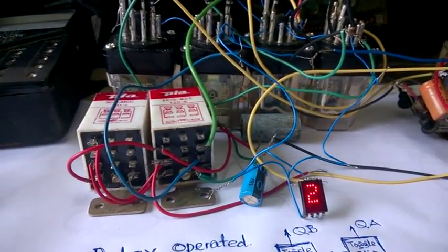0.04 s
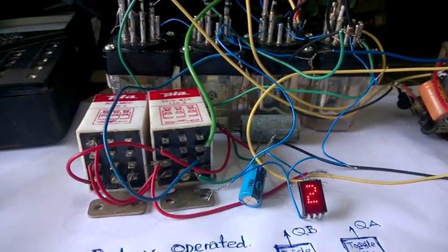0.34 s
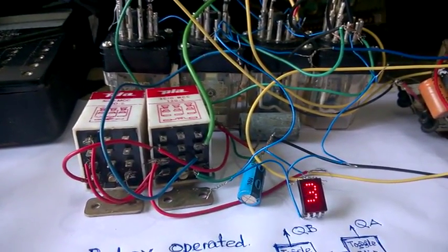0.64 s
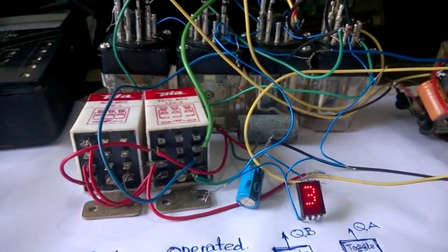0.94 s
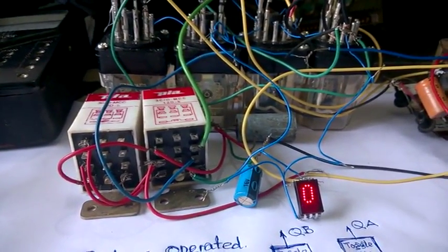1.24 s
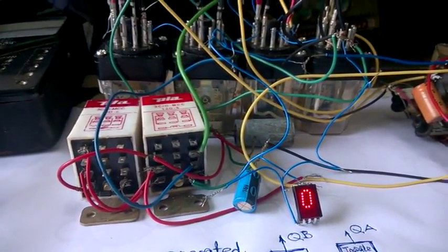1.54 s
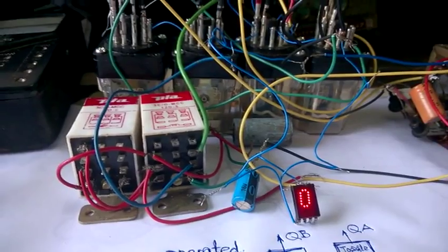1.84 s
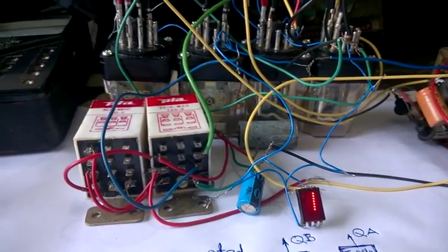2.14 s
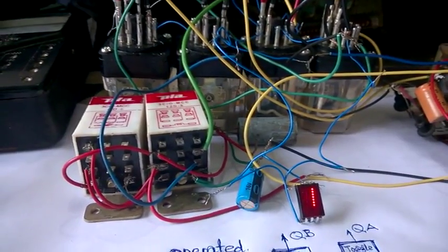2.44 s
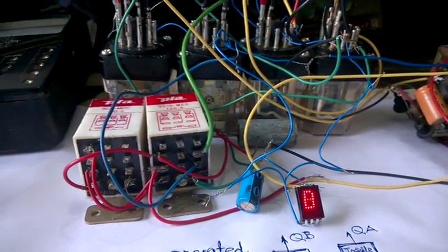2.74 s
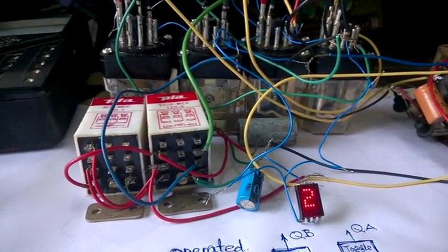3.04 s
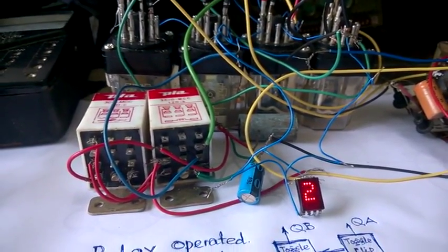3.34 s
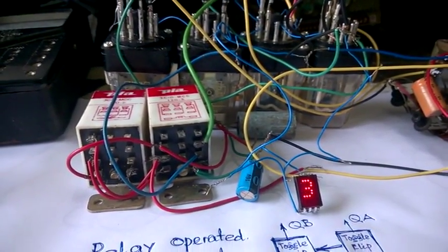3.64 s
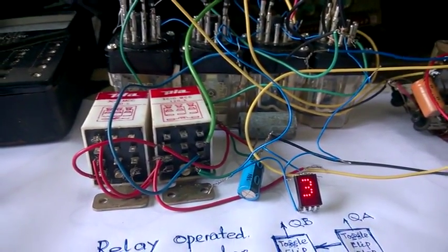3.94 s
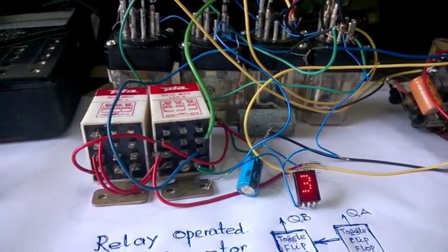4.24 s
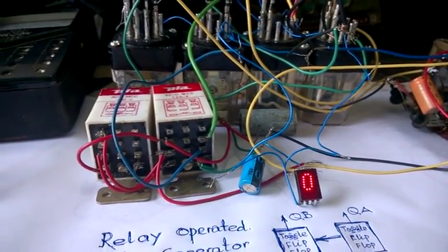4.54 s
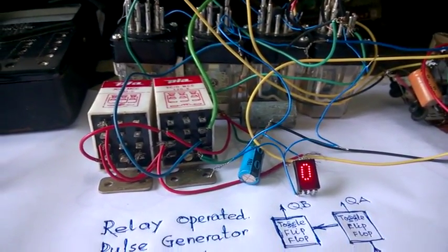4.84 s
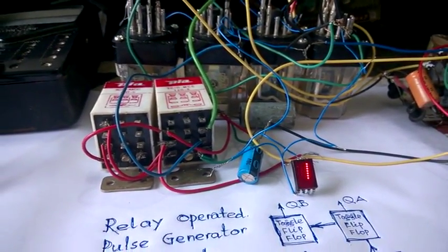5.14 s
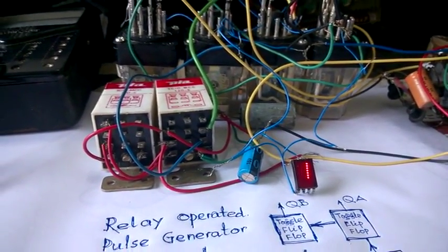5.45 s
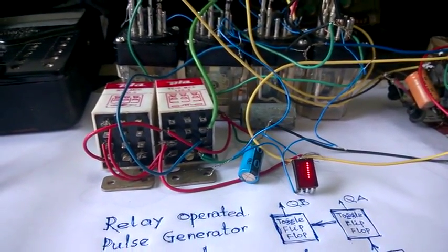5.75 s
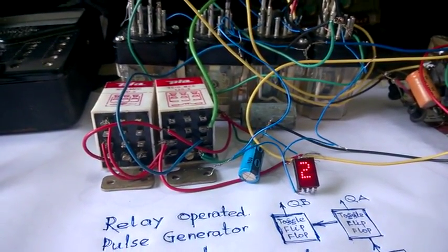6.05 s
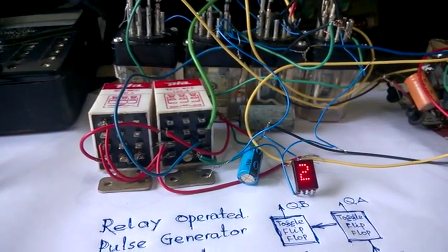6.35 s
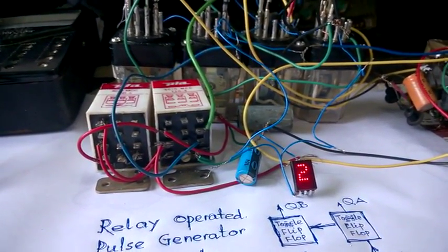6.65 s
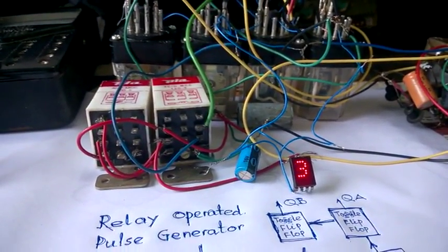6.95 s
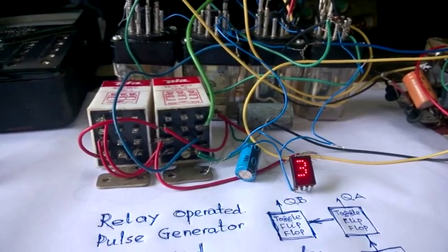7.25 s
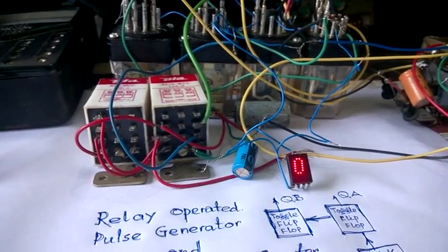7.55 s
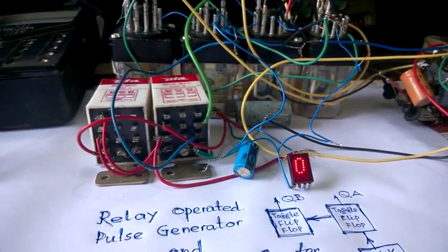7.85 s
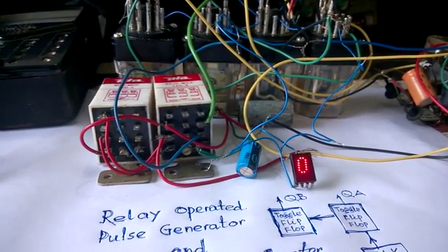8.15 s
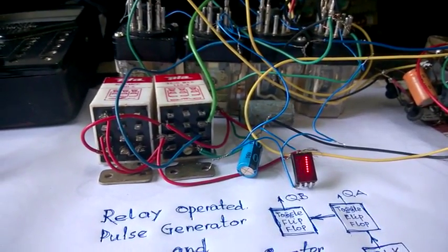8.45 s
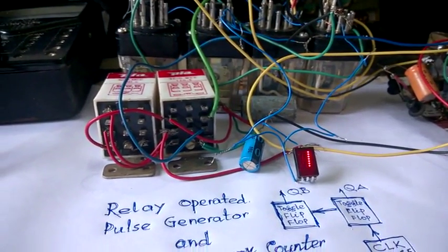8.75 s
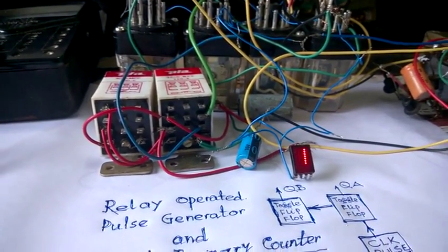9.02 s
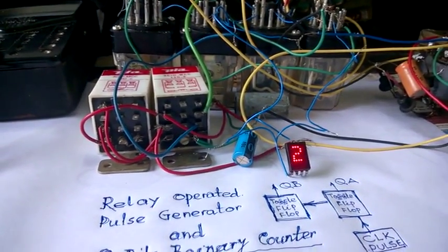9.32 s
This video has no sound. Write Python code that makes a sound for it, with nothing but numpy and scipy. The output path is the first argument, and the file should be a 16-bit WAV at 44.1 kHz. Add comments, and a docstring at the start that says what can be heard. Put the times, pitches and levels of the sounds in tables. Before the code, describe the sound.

Over a very quiet low hum and thin high hiss, a set of relays starts clacking almost at once and keeps a steady beat, a little faster than once a second. Small ticks run straight into each louder metallic snap, and every second step has a slightly busier rattle. Springs ring briefly and the workbench thuds softly. The sound is close and fairly dry, in a small room.

```python
"""A low hum and a thin wavering hiss, then sharp clacks close by, about every 0.8 s:
a two-bit relay counter stepping on a workbench. Each step is a quick cascade: the timing relay trips,
a second relay ticks, the big armatures slam and chatter; on even counts the second stage clacks too.
Springs ring, the bench thumps and a small room answers."""
import sys
import numpy as np
from scipy import signal
from scipy.fft import rfft, irfft, next_fast_len
from scipy.io import wavfile
from scipy.ndimage import uniform_filter1d, minimum_filter1d, map_coordinates

SR = 44100
rng = np.random.default_rng(int(sys.argv[2]) if len(sys.argv) > 2 else 0)


def transcribe(signal):
    """Save signal, clipped to [-1, 1], as a 16-bit WAV file at the path in sys.argv[1]."""
    frames = np.atleast_2d(signal).T
    limited = np.clip(frames, -1, 1)
    pcm = np.round(limited * 32767).astype(np.int16)
    wavfile.write(sys.argv[1], SR, pcm)


N = 422470


def amp(db):
    """Decibels to gain."""
    return 10 ** (np.asarray(db) / 20)


def unit_rms(x):
    """Scale to rms 1."""
    return x / np.sqrt(np.mean(x ** 2) + 1e-20)


def log_interp(points, hz):
    """Interpolate (f/Hz, value) points on a log frequency axis."""
    f, values = np.transpose(points)
    return np.interp(np.log(hz + 1), np.log(f + 1), values)


def wobble(rate_hz):
    """Smooth random curve, rate_hz knots a second."""
    knots = rng.standard_normal(int(N * rate_hz / SR) + 4)
    return map_coordinates(knots, [np.arange(N) * rate_hz / SR])


def filtered(x, response):
    """Apply a complex frequency response."""
    size = next_fast_len(len(x) + SR // 10)
    return irfft(rfft(x, size) * response(np.fft.rfftfreq(size, 1 / SR)), size)[:len(x)]


def noise(spectrum):
    """Coloured noise, rms 1."""
    return unit_rms(filtered(rng.standard_normal(N), lambda hz: amp(log_interp(spectrum, hz))))


def add(track, start_s, sound):
    """Mix a sound into the track."""
    part = track[round(start_s * SR):][:len(sound)]
    part += sound[:len(part)]


def resonances(body):
    """Causal response of parallel band-passes, alternating in sign."""
    return lambda f: sum((-1) ** k * amp(db) * 1j * f * width / (hz * hz - f * f + 1j * f * width)
                         for k, (hz, width, db) in enumerate(body))


def impact(body, chatter_s, rise_s, t60_s):
    """Metal on metal: a burst of tiny bounces drives the body's resonances; rms 1 over the first 5 ms."""
    t = np.arange(SR // 20) / SR
    envelope = (1 - np.exp(-t / rise_s)) * amp(-60 * np.maximum(t - chatter_s, 0) / t60_s)
    bounces = rfft(rng.standard_normal(len(t)) * envelope)
    flattened = bounces / np.sqrt(np.abs(bounces))  # drives the resonances more evenly
    force = irfft(flattened, len(t)) * np.sqrt(envelope)
    click = filtered(force, resonances(body))
    return click / np.sqrt(np.mean(click[:SR // 200] ** 2))


def ring(modes, rise_s, scatter_db):
    """Decaying modes, struck at new strengths each time."""
    t = np.arange(SR // 2) / SR
    tones = np.zeros(len(t))
    for hz, db, t60_s in modes:
        envelope = amp(db + scatter_db * rng.standard_normal() - 60 * t / t60_s)
        tones += envelope * np.sin(2 * np.pi * (hz * t + rng.random()))
    return tones * (1 - np.exp(-t / rise_s))


# noise spectra: f/Hz, relative density/dB
RUMBLE_SPECTRUM = [(12, -32.5), (20, -3), (43, -6.5), (65, -4), (134, -2), (163, -7.5), (195, 3),
                   (219, -11), (255, -1.5), (380, -15), (700, -25), (910, -51.5), (1540, -120)]
AIR_SPECTRUM = [(400, -4.5), (900, -0.5), (1800, 0.5), (3000, -6.5), (4800, -7.5), (7000, -13.5),
                (9000, -21.5), (10700, -17), (12000, -23), (16000, -27)]
# gentle swell midway: t/s, rumble level/dB, air level/dB
SWELL = [(0, -57.5, -63.5), (.7, -55.5, -67.5), (1.5, -55, -62), (3.1, -56, -67), (4.6, -56, -65.5),
         (5.3, -52, -60), (6.2, -53.5, -62.5), (6.9, -56, -64.5), (8.5, -57.5, -63)]
# hum tones: f/Hz, level/dB
HUM_TONES = [(100, -70.5), (197, -64)]
def background():
    """Low rumble, airy noise and hum, each wavering slightly."""
    t = np.arange(N) / SR
    times_s, rumble_db, air_db = np.transpose(SWELL)
    rumble = amp(np.interp(t, times_s, rumble_db) + 1.1 * wobble(3.9)) * noise(RUMBLE_SPECTRUM)
    air = amp(np.interp(t, times_s, air_db) + 0.79 * wobble(5)) * noise(AIR_SPECTRUM)
    hum = sum(amp(db + 2.5 * wobble(2.5)) * np.sin(2 * np.pi * hz * t + .92 * wobble(4.2))
              for hz, db in HUM_TONES)
    return rumble + air + hum


def hiss(centre_hz=5530, width_hz=300, level_db=-77.5, swing_db=5):
    """A thin high noise band comes and goes in uneven spells."""
    band = filtered(rng.standard_normal(N), lambda hz: np.exp(-((hz - centre_hz) / width_hz) ** 2))
    spells = np.tanh(2 * wobble(5.4))
    return amp(level_db + swing_db * spells) * unit_rms(band)


# chirp contour: t/s, f/Hz, level/dB
CHIRP_CONTOUR = [(3.31, 2850, -84), (3.34, 3270, -77), (3.38, 3350, -73), (3.41, 2900, -72),
                 (3.43, 2600, -84)]
# stray ticks: t/s, level/dB
FAINT_TICKS = [(1.0874, -64), (1.3927, -67)]
# their resonance: f/Hz, width/Hz, level/dB
FAINT_TICK_BODY = [(7800, 930, 0)]
def strays():
    """A faint arching chirp and two tiny ticks between steps."""
    t = np.arange(N) / SR
    times_s, hz, db = np.transpose(CHIRP_CONTOUR)
    phase = 2 * np.pi * np.cumsum(np.interp(t, times_s, hz)) / SR
    gate = (t > times_s[0]) & (t < times_s[-1])
    out = amp(np.interp(t, times_s, db)) * np.sin(phase) * gate
    for start_s, tick_db in FAINT_TICKS:
        add(out, start_s, amp(tick_db) * impact(FAINT_TICK_BODY, chatter_s=.002, rise_s=.0004, t60_s=.02))
    return out


# counter steps: trip t/s, trip-to-tick t/s, trip-to-slam t/s,
# then level/dB of tick, slam, high spring, low spring, bench
COUNTER_STEPS = [(0.4296, 0.015, 0.031, -21, -12.5, -18, -20.5, -38.5),
                 (1.2091, 0.014, .0307, -20.5, -11.5, -7, -25, -44.5),
                 (1.9882, .0147, 0.03, -20, -11.5, -9, -10, -33),
                 (2.7769, .016, 0.035, -19.5, -14.5, -8.5, -11.5, -35),
                 (3.5897, 0.015, 0.032, -20, -11, -22, 1, -44.5),
                 (4.327, .014, 0.029, -22, -14, -14, -6, -43.5),
                 (5.0942, 0.014, 0.032, -22.5, -11, -14, 4, -35),
                 (5.9049, 0.015, 0.032, -22, -13.5, -12.5, -17.5, -35.5),
                 (6.71, .016, .0335, -21.5, -11.5, -17, 4.5, -33.5),
                 (7.511, 0.017, 0.036, -19.5, -14.5, -18, -10, -51.5),
                 (8.3139, .0141, 0.031, -22.5, -13.5, -20, 6, -45.5),
                 (9.123, 0.016, 0.034, -21.5, -13.5, -17.5, -18.5, -36)]
def steps(first_count=3):
    """Per step: count reached (0-3), times of trip, tick and slam, five levels."""
    for k, (trip_s, tick_wait_s, slam_wait_s, *levels_db) in enumerate(COUNTER_STEPS):
        yield (first_count + k) % 4, trip_s, trip_s + tick_wait_s, trip_s + slam_wait_s, *levels_db


# tail colour: f/Hz, relative level/dB
ROOM_SPECTRUM = [(100, 4), (300, 4.5), (600, 4), (1000, -5.5), (1600, -5), (2050, -2.5), (2800, 3.5),
                 (3900, -6), (5000, -5), (6000, -3.5), (8000, -5), (12000, -1), (16000, -5)]
# tail decay: f/Hz, t60/s
ROOM_T60 = [(200, 0.35), (1000, .22), (3000, .21), (5000, 0.22), (6500, .195), (9000, .17), (15000, 0.078)]
def room(direct, onset_s=.005):
    """The walls take a moment, then answer each step with a fresh, quickly dying tail."""
    out = np.zeros(N)
    for _, trip_s, *_ in steps():
        hz, t, frames = signal.stft(rng.standard_normal(SR // 2), SR, nperseg=256)
        decay = amp(-60 * t / log_interp(ROOM_T60, hz)[:, None])
        tail = signal.istft(frames * decay, SR, nperseg=256)[1]
        tail = filtered(tail, lambda f: amp(log_interp(ROOM_SPECTRUM, f)))
        tail *= 1 - np.exp(-(np.arange(len(tail)) / SR / onset_s) ** 2)
        cascade = direct[round(trip_s * SR):][:SR // 10]
        add(out, trip_s, signal.fftconvolve(cascade, tail / np.linalg.norm(tail)))
    return out


# modes of metal parts, block on its feet, bench top, base, return spring: f/Hz, relative level/dB, t60/s
METAL_MODES = [(1096.6, -15.5, .15), (1525, -5, .16), (1627, -5, .17), (1980, -8, 0.32), (2070, -8, 0.34),
               (2410, -7.5, 0.14), (2660, -4.5, .25), (3010, -6, .15), (3320, -5, 0.13), (4020, -8.5, .19),
               (4550, -8.5, .19), (5300, -6, .17), (6220, -5.5, .21)]
FEET_MODES = [(88, -47, 0.15)]
BENCH_MODES = [(92, 0, 0.1), (141, -3, .15), (197, -1, .25), (238.5, 5, 0.18), (272.1, 9, .2),
               (291, 3, .16), (312, -2, .15)]
BASE_MODES = [(610, -50, 0.047), (762, -45.5, 0.096), (947, -39, 0.067)]
RETURN_SPRING_MODES = [(1810, -46, .55)]
def shaken_parts():
    """Each slam rings the metal, rocks the relay block and shakes the bench top, which builds up slowly."""
    out = np.zeros(N)
    for count, _, _, slam_s, *_, bench_db in steps():
        even = count % 2 == 0
        rock_db = 5.5 if even else 0  # harder when the second stage moves too
        add(out, slam_s, amp(-33.5) * ring(METAL_MODES, rise_s=.003, scatter_db=3.5))
        add(out, slam_s, amp(rock_db) * ring(FEET_MODES, rise_s=.0027, scatter_db=2))
        add(out, slam_s, amp(bench_db) * ring(BENCH_MODES, rise_s=.028, scatter_db=3))
        if not even:  # the armature lands alone and knocks the base
            add(out, slam_s, ring(BASE_MODES, rise_s=.0025, scatter_db=2.5))
        if count == 1:
            add(out, slam_s, ring(RETURN_SPRING_MODES, rise_s=.003, scatter_db=1))
    return out


def contact_springs(high_hz=6600, low_hz=4000, high_wait_s=.0015, low_wait_s=.0044,
                    rise_s=.0012, t60_s=.017):
    """Two contact springs zing after each slam, each by how squarely it is caught."""
    out = np.zeros(N)
    t = np.arange(SR // 20) / SR
    envelope = (1 - np.exp(-t / rise_s)) ** 2 * amp(-60 * t / t60_s)
    for _, _, _, slam_s, _, _, high_db, low_db, _ in steps():
        detuned_hz = high_hz * (1 + .011 * rng.standard_normal())
        add(out, slam_s + high_wait_s, amp(high_db) * envelope * np.sin(2 * np.pi * detuned_hz * t))
        add(out, slam_s + low_wait_s, amp(low_db) * envelope * np.sin(2 * np.pi * low_hz * t))
    return out


# frame and case resonances of each relay: f/Hz, width/Hz, relative level/dB
TIMER_BODY = [(970, 90, -33), (1750, 210, -4), (2170, 190, -3), (2620, 180, -8.5), (3020, 200, -11),
              (3810, 60, -6.5), (4200, 170, -6.5), (4830, 440, -2), (5590, 440, -5.5), (6600, 180, -17),
              (7510, 320, -19), (8340, 270, -15), (10460, 3000, -27), (14270, 4090, -30.5)]
SECOND_RELAY_BODY = [(1050, 50, -40), (1562, 120, 0), (2014, 320, -2), (2700, 390, -10), (3850, 760, -12),
                     (4690, 730, -6.5), (5940, 480, -5), (6280, 2000, -13), (7900, 600, -9),
                     (8460, 700, -14.5), (11150, 480, -12.5), (14390, 620, -15.5)]
STAGE_TWO_BODY = [(993, 150, -13), (1240, 130, -11.5), (1660, 720, -13.5), (2640, 340, -6), (3340, 240, -4),
                  (3950, 100, -2), (4280, 340, 3), (5460, 240, -6), (6350, 480, -8), (7800, 260, -6),
                  (8280, 490, -12.5), (10200, 1400, -11), (11600, 520, -12.5), (15400, 410, -19.5)]
# double clack on "drop out" (count 0) and "pull in" (count 2): t/s after the tick, level/dB
STAGE_TWO_CLACKS = {"drop out": [(.0052, -13.5), (.012, -17)], "pull in": [(.006, -15), (.0255, -21.5)]}
def light_relays(trip_db=-27.5):
    """The timing relay trips, a second relay ticks; on even counts the second stage clacks twice."""
    out = np.zeros(N)
    for count, trip_s, tick_s, _, tick_db, *_ in steps():
        trip = impact(TIMER_BODY, chatter_s=.0015, rise_s=.0003, t60_s=.018)
        tick = impact(SECOND_RELAY_BODY, chatter_s=.0011, rise_s=.0002, t60_s=.026)
        add(out, trip_s, amp(trip_db) * trip)
        add(out, tick_s, amp(tick_db) * tick)
        if count % 2 == 0:
            for wait_s, clack_db in STAGE_TWO_CLACKS["pull in" if count else "drop out"]:
                clack = impact(STAGE_TWO_BODY, chatter_s=.0018, rise_s=.0002, t60_s=.011)
                add(out, tick_s + wait_s, amp(clack_db) * clack)
    return out


# frame and case resonances of the big relays: f/Hz, width/Hz, relative level/dB
BIG_RELAY_BODY = [(910, 490, -27.5), (1660, 480, -6.5), (2143, 260, -5.5), (2590, 280, -9),
                  (3250, 160, -5.5), (3975, 100, 0), (4519, 230, -3.5), (5040, 300, -2), (6060, 280, -6.5),
                  (7390, 1800, -7), (7720, 1200, -10.5), (10100, 1370, -27), (14950, 400, -30)]
def armatures():
    """The heavy armatures slam home and chatter for a few milliseconds."""
    out = np.zeros(N)
    for _, _, _, slam_s, _, slam_db, *_ in steps():
        slam = impact(BIG_RELAY_BODY, chatter_s=.0045, rise_s=.00024, t60_s=.023)
        add(out, slam_s, amp(slam_db) * slam)
    return out


def scene():
    """Close relays, their room and the background, in mono."""
    knocks = light_relays() + armatures()
    zings = contact_springs()
    reverb = amp(-9) * room(knocks + amp(-13) * zings)
    return (knocks + zings + reverb + shaken_parts() + strays() + background() + hiss())[None]


def record(dry, threshold_db=-0.7, cutoff_hz=16200):
    """A 1 ms limiter rounds off the loudest clicks; a steep low-pass follows."""
    x = dry[0]
    needed_gain = np.minimum(1, amp(threshold_db) / (np.abs(x) + 1e-9))
    gain = uniform_filter1d(minimum_filter1d(needed_gain, size=45), size=45)
    return filtered(x * gain, lambda hz: 1 / np.sqrt(1 + (hz / cutoff_hz) ** 120))[None]


dry = scene()
out = record(dry)
transcribe(out)
```